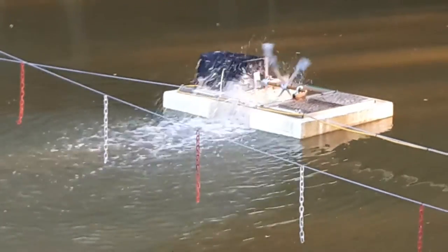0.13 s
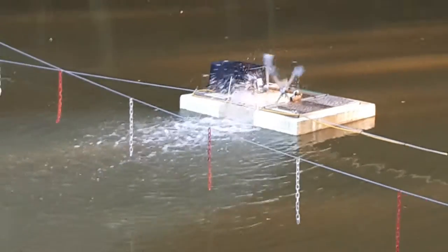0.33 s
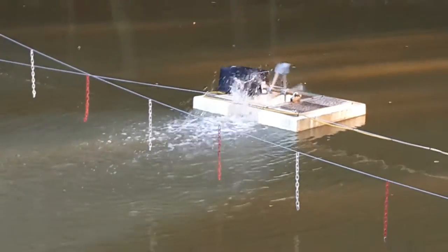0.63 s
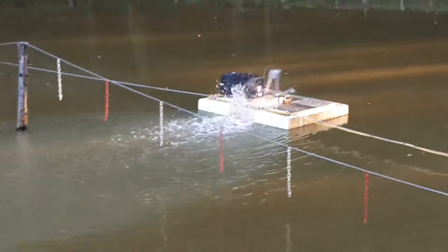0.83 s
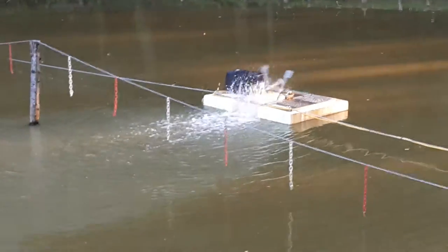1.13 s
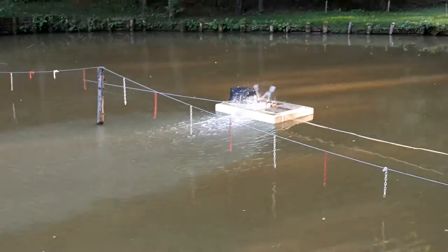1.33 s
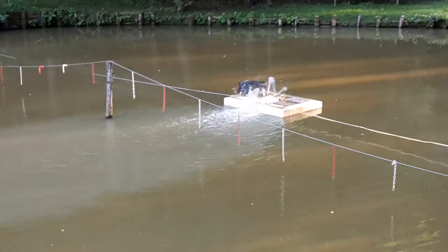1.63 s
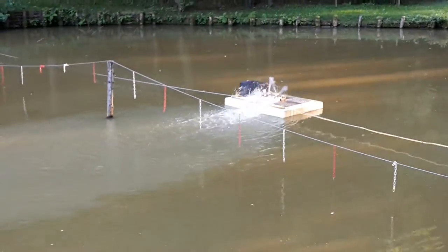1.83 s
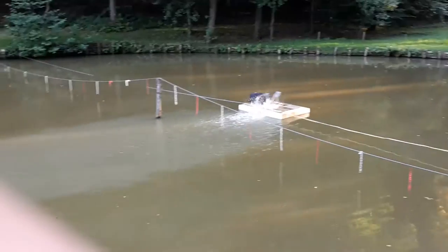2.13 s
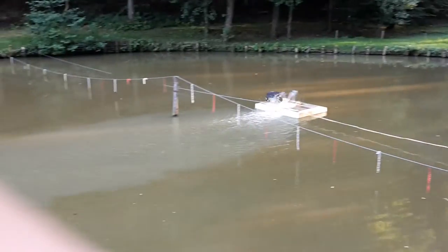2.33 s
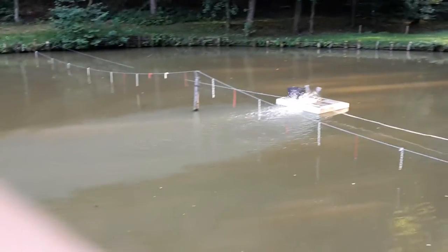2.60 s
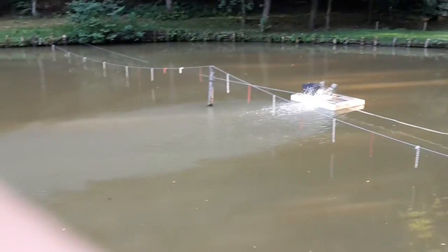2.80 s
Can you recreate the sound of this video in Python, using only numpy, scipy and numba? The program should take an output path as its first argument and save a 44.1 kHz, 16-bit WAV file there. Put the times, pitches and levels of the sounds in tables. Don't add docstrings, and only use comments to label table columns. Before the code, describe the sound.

Paddles of a pond aerator splash steadily outdoors, bubbling and hissing, while wind thuds at the microphone

```python
import sys
import numpy as np
from scipy import signal
from scipy.fft import rfft, irfft
from scipy.io import wavfile
from scipy.ndimage import uniform_filter1d
from numba import njit

SR = 44100
rng = np.random.default_rng(int(sys.argv[2]) if len(sys.argv) > 2 else 0)


def to_linear_factor(level_db):
    exponent = np.asarray(level_db, float) / 20
    return 10 ** exponent


def output_pcm(signal):
    pcm = np.clip(np.atleast_2d(signal).T, -1, 1) * 32767
    wavfile.write(sys.argv[1], SR, np.round(pcm).astype(np.int16))


N = 130536

# [t/s, peak level/dB]
SPLATS = [(0.0458, -39), (0.281, -39), (0.863, -41), (0.966, -42.5), (1.1155, -42.5), (1.1348, -38),
          (1.302, -36), (1.4491, -42.5), (1.8003, -40.5), (1.9062, -39), (1.9579, -45), (1.997, -41.5),
          (2.0735, -44.5), (2.1081, -45), (2.2152, -35), (2.4064, -50.5), (2.4364, -51), (2.4808, -45.5),
          (2.7906, -37.5)]


def table(rows, hz):
    rows = np.array(rows, float)
    return np.interp(np.log(hz + 1), np.log(rows[:, 0]), rows[:, 1])


def unit(x):
    return x / np.sqrt(np.mean(x ** 2))


def walk(rate_hz):
    hold = int(SR / rate_hz)
    x = np.repeat(rng.standard_normal(N // hold + 1), hold)
    x = uniform_filter1d(uniform_filter1d(x, hold), hold)[:N]
    return unit(x - uniform_filter1d(x, size=5 * hold))


def band(x, hz, width_hz):
    f = np.arange(N // 2 + 1) * SR / N + 1
    return irfft(rfft(x) / (1 + 1j * (f / hz - hz / f) * hz / width_hz), N)


@njit
def rings(n, start, hz, t60, size, glide, rise):
    out = np.zeros(n)
    for e in range(len(start)):
        phase, length = 0., t60[e] * SR
        for i in range(min(int(length), n - start[e])):
            phase += hz[e] * (1 + glide * i / length) / SR
            swell = min(phase / rise, 1.)
            decay = 1000. ** (-i / length)
            out[start[e] + i] += size[e] * swell * np.sin(2 * np.pi * phase) * decay
    return out


def hits(rows, t60_s, glide, rise):
    r = np.array(rows, float)
    start = (r[:, 0] * SR).astype(np.int64)
    return rings(N, start, r[:, 2], t60_s + 0 * r[:, 0], to_linear_factor(r[:, 1]), glide, rise)


def swells(t, rows, width_s):
    out = 0
    for at, db, hz in rows:
        bell = np.exp(-((t - at) / width_s) ** 2 / 2)
        out = out + to_linear_factor(db) * bell * np.sin(2 * np.pi * hz * (t - at))
    return out


def grains(per_s, lo_hz, hi_hz, cycles, spread_db, glide):
    when, pitch, size = rng.random((int(per_s * N / SR), 3)).T
    hz = lo_hz * (hi_hz / lo_hz) ** pitch
    size = to_linear_factor(spread_db * np.minimum(-np.log(1 - size), 3.5))
    x = rfft(rings(N, (when * N).astype(np.int64), hz, cycles / hz, size, glide, 0.19))
    f = np.arange(len(x)) * SR / N
    inside = 1 / (1 + (lo_hz / (f + 1)) ** 4) / (1 + (f / hi_hz) ** 4)
    return irfft(inside * x / np.sqrt(uniform_filter1d(abs(x) ** 2, size=600)), N) * np.sqrt(N)


def churn(surge, lift, patter):
    f = np.arange(N // 2 + 1) * SR / N + 1
    shared = [walk(24.28) for _ in range(5)]
    x = 0
    for k, hz in enumerate(70 * 2 ** (np.arange(17) / 2)):
        weight = np.cos(np.clip(np.log2(f / hz), -.5, .5) * np.pi)
        part = irfft(rfft(rng.standard_normal(N)) * weight, N)
        x = x + part * to_linear_factor(0.39 * shared[k // 4] + 0.27 * walk(6.2))
    bubbles = grains(1200, 241.3, 5160, cycles=15.4, spread_db=2.96, glide=0.47)
    fizz = grains(3000, 10000, 17000, cycles=3.9, spread_db=9.9, glide=.2)
    drops = grains(160, 6500, 11000, cycles=2.2, spread_db=4., glide=.2)
    x = x + to_linear_factor(-0.5) * bubbles + to_linear_factor(-0.5) * fizz + to_linear_factor(-1.5) * drops
    high = irfft(rfft(x) * np.clip(f / 9000, .1, 1), N)
    spray = irfft(rfft(x) * (f > 7000), N)
    surged = (x - spray) * to_linear_factor(surge) + spray * to_linear_factor(.3 * surge)
    return surged + high * (lift + to_linear_factor(0.93 * patter) - 1)


def water_colour(f, port):
    # [f/Hz, level/dB]
    left_body, left_spray = [(150, -75.5), (420, -71), (720, -77), (1400, -85), (2100, -87.5), (2800, -91),
                             (4000, -90), (5200, -101)], [(9200, -112), (9800, -101), (11500, -94.5), (14500, -100)]
    right_body, right_spray = [(300, -75.5), (720, -76.5), (1450, -84), (1800, -94.5), (2150, -82),
                               (2500, -91.5), (4100, -78.5), (5200, -92)], [(9100, -100), (10100, -77.5), (11200, -84),
                                                   (12500, -86.5), (13800, -89.5), (14600, -97.5)]
    rows = np.vstack([right_body, right_spray] if port else [left_body, left_spray])
    notch = 1 - 0.37 * np.exp(-((f - 3085) / 110) ** 2 / 2)
    return to_linear_factor(table(rows, f)) * np.sqrt(SR / 2) * notch


def echo_path(f, port):
    echo_s, echo_db, echo_rad = [(0.001452, -2.5, 0.86), (0.001512, -20.5, 0.7)][port]
    lag_s = .00002 * (1 - port)
    echo = to_linear_factor(echo_db) / (1 + (f / 4500) ** 4) * np.exp(1j * echo_rad - 2j * np.pi * f * echo_s)
    return np.exp(-2j * np.pi * f * lag_s) * (1 + echo)


def scatter_share(f):
    # [f/Hz, level re direct/dB]
    scatter_rows = [(200, -7.5), (450, -18), (700, -9.5), (1200, -3.5), (1600, -1), (4000, -2), (10000, 0),
                    (13000, 1.5)]
    return to_linear_factor(table(scatter_rows, f))


def turned_away(t, f, wet):
    # [t/s, gain at full shading/dB]
    turn_rows = [(0, 1.5), (.4, 1.5), (1.5, -1), (2.0, -1.5), (2.5, -15.5), (2.96, -30)]
    # [f/Hz, share]
    shade_rows = [(2500, 0.014), (4200, 0.61), (10000, 0.14), (12800, 0.71), (14500, 0.11)]
    lost = 1 - to_linear_factor(np.interp(t, *np.array(turn_rows, float).T))
    return lost * irfft(wet * np.clip(table(shade_rows, f), 0, 1.2), N)


def splats(t):
    return sum(to_linear_factor(db + 17) * (t > at) * np.exp(-abs(t - at) / 0.004) for at, db in SPLATS)


def ticks(f):
    late_s, tick_db, low_cut_hz = 0.00083, 63.5, 8000
    x, r = np.zeros(N), np.array(SPLATS)
    x[((r[:, 0] + late_s) * SR).astype(int)] = to_linear_factor(r[:, 1] + tick_db)
    return rfft(x) / (1 + (low_cut_hz / (f + 1)) ** 4)


def slaps():
    # [t/s, peak level/dB, f/Hz]
    slap_rows = [(0.131, -27.5, 660), (0.276, -27, 620), (0.333, -30, 650), (0.41, -31, 640),
                 (0.438, -30.5, 700), (0.62, -27, 670), (0.673, -26, 653), (0.775, -31, 707),
                 (1.047, -30, 720), (1.179, -26.5, 740), (1.471, -31, 664), (1.508, -31, 715),
                 (2.044, -30, 523), (2.078, -31.5, 660), (2.883, -26.5, 620), (1.31, -28, 570),
                 (1.422, -30, 712), (1.662, -29, 694), (1.978, -26.5, 657), (2.005, -28.5, 753),
                 (2.02, -28.5, 640), (2.115, -27.5, 640), (2.283, -38, 657)]
    return to_linear_factor(3.5) * hits(slap_rows, t60_s=0.023, glide=-0.21, rise=2.37)


def plops(t):
    # [t/s, level/dB, f/Hz]
    plop_rows = [
        (0.34, -38, 354),
        (.41, -41, 388),
        (0.561, -40.5, 270),
        (1.583, -39.5, 370),
        (1.9, -68, 342),
        (2.89, -38.5, 392),
        (2.012, -42, 777),
        (2.88, -44, 606),
    ]
    return swells(t, plop_rows, width_s=0.016)


def motor(t):
    # [t/s, level/dB, f/Hz]
    groan_rows = [(0.022, -43, 209.4), (0.248, -48.5, 208), (0.691, -46.5, 193), (0.871, -45.5, 214),
                  (1.13, -46.5, 182), (1.221, -47.5, 208.5), (1.519, -41, 212.7), (1.698, -42, 205),
                  (1.809, -58, 196), (2.188, -49.5, 209), (2.361, -47.5, 197.6), (2.551, -45.5, 209),
                  (2.922, -46, 211)]
    hum_hz = 209
    hum = unit(band(band(rng.standard_normal(N), hum_hz, 17), hum_hz, 17))
    return to_linear_factor(-62.5) * hum + swells(t, groan_rows, width_s=0.024)


def wind(t, port):
    # [t/s, left level/dB, right level/dB]
    wind_rows = [(0, -50, -70), (.3, -50, -89), (.39, -39.5, -71), (.5, -52, -59), (1.3, -48.5, -76),
                 (1.421, -46, -56), (1.47, -49, -62), (1.6, -37, -73), (1.8, -37.5, -54),
                 (1.87, -42.5, -79), (2.001, -39, -50), (2.1, -44.5, -76), (2.2, -40, -78),
                 (2.45, -41, -74), (2.7, -40, -76), (2.8, -47, -67), (2.9, -42, -80)]
    # [t/s, peak level/dB, f/Hz, t60/s]
    left_buffets = [(1.3498, -2.5, 204, 0.013), (1.358, -10, 66, 0.088), (1.393, -23, 112, 0.11),
                    (1.5142, -13.5, 138, 0.039), (1.524, -17, 70, 0.091), (1.653, -26, 80, 0.062),
                    (1.775, -16, 70.6, 0.048), (1.79, -9, 90, 0.03), (1.911, -19, 75, 0.064),
                    (1.9974, -12.5, 162, 0.03), (2.012, -17.5, 138, 0.038), (1.992, -25, 66, 0.16),
                    (2.251, -24.5, 77.5, 0.099), (2.704, -24, 71, 0.12), (2.642, -18.5, 76.5, 0.05)]
    right_buffets = [
        (0.403, -33, 59.4, 0.089),
        (0.836, -29, 59.5, 0.069),
        (1.396, -13, 171, 0.033),
        (1.516, -43, 130, .05),
        (1.777, -14.5, 149, 0.021),
        (1.941, -31, 111, 0.057),
        (2.01, -45, 75, 0.14),
    ]
    w = np.array(wind_rows, float)
    buffets = np.array(right_buffets if port else left_buffets, float)
    centre_hz, width_hz = [(66, 13), (90, 390)][port]
    gust = band(rng.standard_normal(N) * to_linear_factor(2.9 * walk(30.25)), 40, 110)
    low = unit(band(gust, centre_hz, width_hz))
    low = low + 0.17 * unit(band(band(gust, 66, 60), 110, 86)) + .5 * unit(band(gust, 52, 30))
    low = low / np.sqrt(uniform_filter1d(low ** 2, size=int(.12 * SR)))
    thuds = hits(buffets, buffets[:, 3], glide=-0.065, rise=.8)
    return low * to_linear_factor(np.interp(t, w[:, 0], w[:, 1 + port])) - thuds


def puffs(t, port):
    # [t/s, left level/dB, right level/dB, width/s]
    puff_rows = [
        (1.3533, -18, -58, 0.0011),
        (2.3811, -27, -29, .0003),
        (1.3965, -63, -25, 0.00036),
    ]
    return sum(to_linear_factor(row[1 + port]) * np.exp(-((t - row[0]) / row[3]) ** 2 / 2) for row in puff_rows)


def chirps(t, port):
    # [t/s, peak level/dB, f/Hz]
    left_chirps = [
        (2.56, -80, 7300),
        (2.565, -80, 5850),
        (2.6, -75, 7150),
        (2.67, -79, 7330),
        (2.84, -78, 7000),
        (2.885, -75, 7200),
        (2.89, -72, 8450),
    ]
    right_chirps = [(.09, -81, 8450), (.14, -78, 8860), (2.475, -76, 8900), (2.61, -74, 8850),
                    (2.77, -78, 8850), (.29, -77, 8350), (.5, -69, 8380), (.7, -83, 8450), (.8, -72, 8350),
                    (.875, -72, 8350), (.96, -79, 8630), (1.05, -74, 8290), (1.155, -82, 8450),
                    (1.3, -81, 5800), (1.315, -74, 8350), (1.73, -71, 8300), (1.825, -71, 8370),
                    (2.205, -69.5, 8210)]
    chirp_s = 0.012
    return swells(t - chirp_s, right_chirps if port else left_chirps, chirp_s)


def deafen(x, port):
    leak_at_s, leak_s = 2.9, .012 - port
    f, t, z = signal.stft(x, SR, nperseg=1024)
    flutter_hz = 75 * np.repeat(rng.standard_normal((len(t), 2)), 2, axis=0)[:len(t)].T
    lo_hz, hi_hz = np.array([[5290], [9120]]) + flutter_hz
    inside = (f[:, None] > lo_hz) & (f[:, None] < hi_hz)
    gain = to_linear_factor(-60 * (abs(t - leak_at_s) > leak_s) * inside)
    return signal.istft(z * gain, SR, nperseg=1024)[1][:N]


def scene():
    t, f = np.arange(N) / SR, np.arange(N // 2 + 1) * SR / N
    surge = .35 * walk(7.73) + 0.81 * walk(25.505)
    lift, patter = splats(t), walk(65.)
    water = rfft(churn(surge, lift, patter))
    solid = rfft(slaps() + plops(t))
    hum, drips = motor(t), ticks(f)
    out, gale = [], 0
    for port in (0, 1):
        colour, path, scatter = water_colour(f, port), echo_path(f, port), scatter_share(f)
        scattered = scatter * rfft(churn(surge, lift, patter))
        wet = colour * (water * path + scattered) / np.sqrt(1 + scatter ** 2) / 1.51
        wet = wet + colour * drips * path
        x = irfft(wet + solid * path / 2.0, N)
        if port:
            x = x - turned_away(t, f, wet)
        gale = wind(t, port) + to_linear_factor(-26) * gale
        heard = deafen(x + hum + gale + puffs(t, port), port)
        out.append(heard + chirps(t, port))
    return np.array(out)


def band_limit(x):
    return signal.sosfilt(signal.butter(12, 14850, fs=SR, output="sos"), x)


def record(dry):
    shut = irfft(rfft(dry) * (np.arange(N // 2 + 1) * SR / N < 14600), N)
    low_cut = signal.butter(2, 28, "high", fs=SR, output="sos")
    return band_limit(signal.sosfilt(low_cut, shut))


dry = scene()
out = record(dry)
output_pcm(out)
```